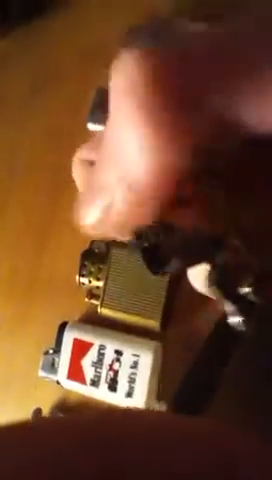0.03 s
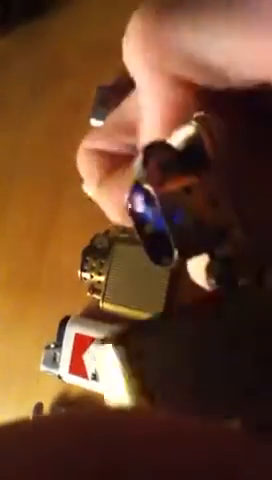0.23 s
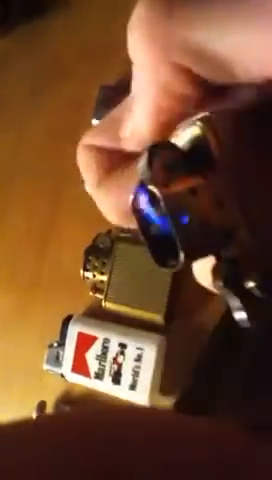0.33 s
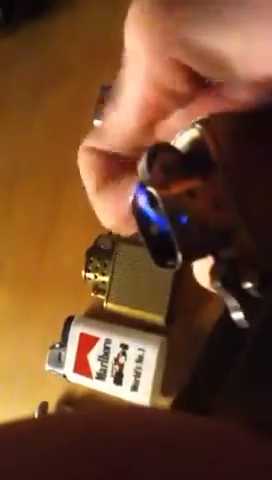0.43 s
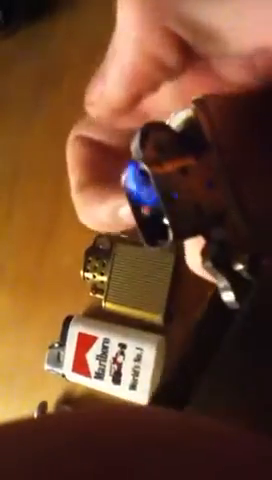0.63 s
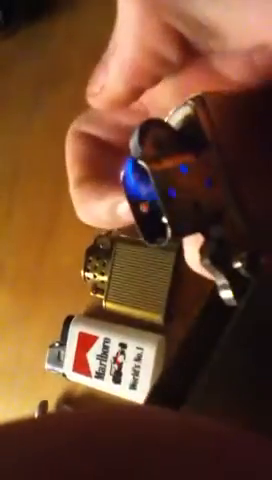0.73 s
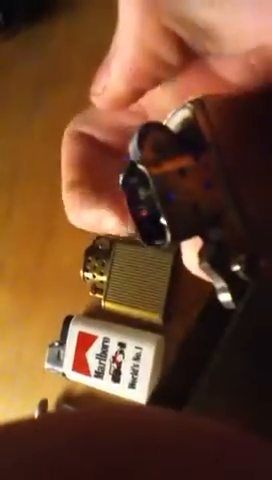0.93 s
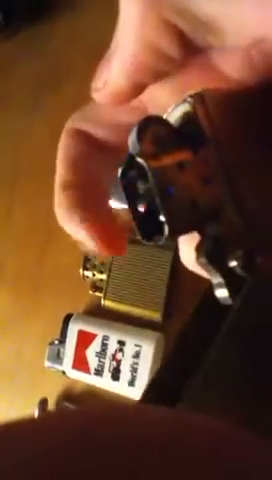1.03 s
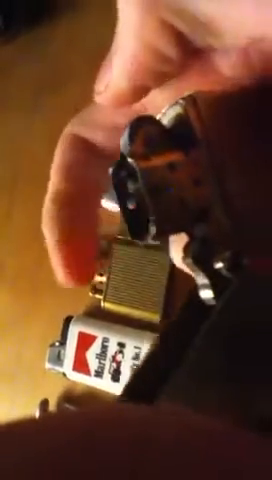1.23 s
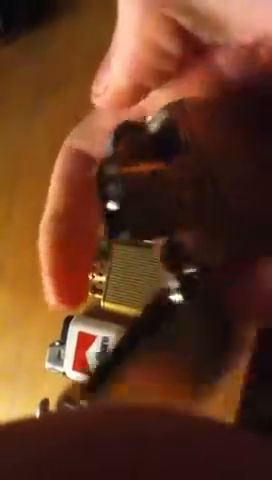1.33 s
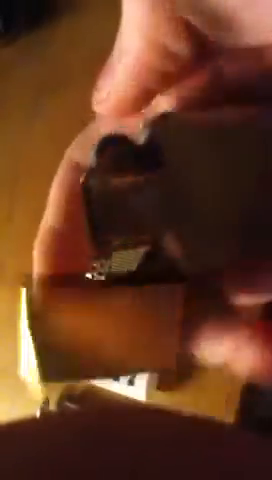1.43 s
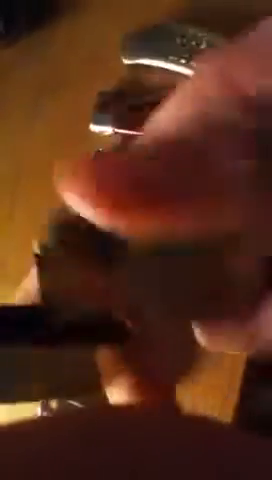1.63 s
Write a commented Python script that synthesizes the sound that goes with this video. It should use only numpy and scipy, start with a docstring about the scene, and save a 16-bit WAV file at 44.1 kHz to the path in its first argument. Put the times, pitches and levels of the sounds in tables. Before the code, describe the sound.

A metal flip lighter, very close in a small quiet room. After faint rumble and hiss, a tiny scrape leads to a sharp lid click at 0.23 s, then a louder, gritty flint-wheel snap at 0.26 s. The thin case rings bright and high, with small knocks and ticks until 0.47 s. A soft dull thump comes near 0.88 s, then quiet, and a lighter metallic tap at 1.55 s.

```python
"""In a quiet room, a thin metal pocket lighter is handled close to a phone: the lid clicks open, the flint wheel
rasps, loose parts knock the case so that its walls ring, and later it is tapped once more.
Case and lid are sums of decaying sines; clicks and rasp are impulses and dense grit exciting short body
resonances, with a noise tail for the room. Dull thumps are low damped modes.
Filtered noise makes the rumble and hiss beneath, and a faint sine the high whine."""
import sys
import numpy as np
from scipy import signal
from scipy.fft import rfft, irfft
from scipy.io import wavfile
from scipy.ndimage import uniform_filter1d

SR = 44100
rng = np.random.default_rng(int(sys.argv[2]) if len(sys.argv) > 2 else 0)


def ratio_of_db(decibels):
    """Turn decibels (scalar or array-like) into linear amplitude factors; 0 dB maps to 1."""
    return 10 ** (np.asarray(decibels, float) / 20)


def pcm_store(signal):
    """Save signal as 16-bit PCM."""
    levels = np.round(np.clip(np.atleast_2d(signal), -1, 1) * 32767)
    wavfile.write(sys.argv[1], SR, levels.astype(np.int16).T)


N = 74970  # samples

# knocks and touches that restart or damp the case's ring; click levels hold at 2 kHz, edge levels at the
# lowest edge mode:
# start_s, click_db, click_tilt_db_per_octave, wall_db, wall_t60_s (as gripped), edge_db, edge_tilt_db_per_octave
CONTACT_TABLE = [(.230, -9, -0.5, -45.5, 0.088, -48, -4), (.2648, -2, -5.5, -26, 0.12, -42, -11),
                 (.278, -24.5, 4, -23, 0.13, -33, -9), (.2955, -51, -11, -71, .1, -30.5, -13),
                 (.299, -47, 12, -24.5, 0.22, -35, -16), (.338, -41.5, 8, -37, 0.037, -44, -28),
                 (0.353, -55, -4, -49.5, 0.45, -46.5, -25), (.382, -80, 0, -64, 0.9, -54, -16),
                 (.442, -30.5, 0.5, -46.5, 0.38, -52.5, -8), (.462, -39, 2.5, -43.5, .2, -64, -5),
                 (0.468, -54, 6, -58.5, 0.28, -63.5, -3), (1.519, -70, -5, -55, 0.066, -80, 14),
                 (1.5535, -23.5, 5.5, -37.5, 0.057, -38.5, 2)]


def mode(x, hz, t60):
    """Damped resonator: a complex pole answers a unit impulse with a decaying sine of unit starting envelope."""
    pole = np.exp(2j * np.pi * hz / SR - np.log(1000) / (max(t60, 1e-3) * SR))
    return signal.lfilter([1], [1, -pole], x + 0j).imag


def struck_modes(strikes):
    """Superposition: each strike (start_s, level_db, pitch_hz, t60_s) rings freely over the earlier ones."""
    out = np.zeros(N)
    for start_s, level_db, hz, t60 in strikes:
        impulse = np.zeros(N)
        impulse[int(start_s * SR)] = ratio_of_db(level_db)
        out += mode(impulse, hz, t60)
    return out


def walk(rate):
    """Slow random drift: held random values smoothed twice, scaled to unit standard deviation."""
    hold = int(SR / rate)
    steps = np.repeat(rng.standard_normal(N // hold + 1), hold)
    drift = uniform_filter1d(uniform_filter1d(steps, hold), hold)[:N]
    return drift / drift.std()


def ring(hz, levels_db, t60s):
    """Exponential decay of one case mode: each knock or touch ends the old ring and sets a new level and decay."""
    t = np.arange(N) / SR
    starts = np.array([contact[0] for contact in CONTACT_TABLE])
    latest = np.searchsorted(starts, t, side="right") - 1
    age = np.abs(t - starts[latest])
    decay_db = 60 * age / np.maximum(np.asarray(t60s)[latest], 1e-3)
    envelope = np.where(latest < 0, 0, ratio_of_db(np.asarray(levels_db)[latest] - decay_db))
    envelope = uniform_filter1d(envelope, size=24)  # softens the jump at each contact
    return envelope * np.sin(2 * np.pi * hz * t + rng.uniform(0, 2 * np.pi))


def case():
    """Modal vibration: broad walls decay as the grip damps them, stiff edges at their own fixed rates."""
    # broad wall modes: pitch_hz, relative_level_db
    wall_modes = [(1455, 0), (1860, -11), (1545, -17)]
    # stiff edge and lid modes: pitch_hz, relative_level_db, t60_s
    edge_modes = [(4555, 0, .33), (7305, -3, .115), (7682, -23, .17), (9889, -3, .095), (11140, -22, .11),
                  (13330, -17, .046)]
    rows = np.array(CONTACT_TABLE)
    out = np.zeros(N)
    for hz, db in wall_modes:
        out += ring(hz, rows[:, 3] + db, rows[:, 4])
    for hz, db, t60 in edge_modes:
        octaves = np.log2(hz / edge_modes[0][0])
        out += ring(hz, rows[:, 5] + db + rows[:, 6] * octaves, np.full(len(rows), t60))
    return out


def lid():
    """Light damping: the free-hanging lid's long thin ring carries on through later knocks."""
    # strikes on the lid: start_s, level_db, t60_s
    lid_strikes = [(.278, -54, 0.74), (1.5535, -55.5, 0.35)]
    lid_hz = 5195
    return struck_modes([(start_s, db, lid_hz, t60) for start_s, db, t60 in lid_strikes])


def grit():
    """Friction grain noise: dense random impulses of scattered size, high-passed and set to a fixed rms."""
    grains_per_s, scatter_db, low_cut_hz = 15000, 3, 1300
    present = rng.random(N) < grains_per_s / SR
    grains = present * rng.standard_normal(N) * ratio_of_db(scatter_db * rng.standard_normal(N))
    grains = signal.sosfilt(signal.butter(2, low_cut_hz, "high", fs=SR, output="sos"), grains)
    return grains / grains.std() / np.sqrt(40)


def wheel_rasp():
    """Friction on the flint wheel as a moving excitation spectrum: level in dB at 2 kHz, and tilt per octave."""
    # moments of the rasp: start_s
    wheel_times = [.249, .253, .257, .260, .2632, .2655, .2675, .273, .29, .32, .342, .35]
    # rasp at those moments: level_db (at 2 kHz, before the rattle), treble_tilt_db_per_octave
    wheel_strength = [(-50, -5), (-30, -4), (-20, 7.5), (-25.5, 10), (-21, 8), (-12, -2.5), (-21.5, 12),
                      (-39.5, 7), (-35, -2), (-50.5, 3), (-65, 12), (-80, 0)]
    rattle_db, rattle_per_s = 3, 250
    t = np.arange(N) / SR
    strength = np.array(wheel_strength)
    level_db = np.interp(t, wheel_times, strength[:, 0], left=-120, right=-120)
    tilt = np.interp(t, wheel_times, strength[:, 1])
    level_db = level_db + rattle_db * walk(rattle_per_s) * (t > wheel_times[7])
    return level_db, tilt


def thumb_scrape():
    """Growing friction: the gain of the thumb's scrape rises just before the lid snaps."""
    # scrape: start_s, end_s, end_level_db, rise_db
    lead_in = (.221, .230, -29, 20)
    start_s, end_s, end_db, rise_db = lead_in
    t = np.arange(N) / SR
    remaining = np.clip((end_s - t) / (end_s - start_s), 0, 1)
    return ((t > start_s) & (t < end_s)) * ratio_of_db(end_db - rise_db * remaining)


def clicks():
    """Source and filter: contacts, ticks and grit excite the short body resonances that colour them."""
    # small ticks that leave the ring alone: start_s, level_db (at 2 kHz), tilt_db_per_octave
    small_ticks = [(0.2312, -23.5, -0.5), (.246, -61, -3), (0.282, -40, 6), (.289, -43, -6),
                   (.303, -47, -7), (.326, -48, 9), (.4435, -47, 2), (0.448, -39, -14), (.4505, -46, -11),
                   (.472, -49, 4), (.797, -51, 5), (1.5541, -33.5, 8), (.263, -12.5, -12), (.2585, -44, 22)]
    # short body resonances: pitch_hz, relative_level_db, t60_s
    body_modes = [(650, -17, 0.004), (1409, -12, 0.03), (1950, -2.5, 0.0093), (2132, -6, .03),
                  (2304, 2, 0.012), (2504, -1.5, 0.018), (2957, -0.5, 0.0093), (3670, -6, .01),
                  (4120, 1, 0.005), (4940, 1.5, 0.0048), (5650, -9, 0.0034), (6120, -7.5, 0.0053),
                  (7470, -4, 0.0036), (8680, -1.5, 0.0027), (10200, -5, 0.0027), (12700, -29, 0.01),
                  (15000, -38, 0.0065)]
    colour_scatter_db, low_cut_hz = 3.5, 470
    rows = np.array([contact[:3] for contact in CONTACT_TABLE] + small_ticks)
    at = (rows[:, 0] * SR).astype(int)
    colour = colour_scatter_db * rng.standard_normal((len(rows), len(body_modes)))
    grains = grit()
    wheel_db, wheel_tilt = wheel_rasp()
    scrape = thumb_scrape()
    out = np.zeros(N)
    for j, (hz, db, t60) in enumerate(body_modes):
        octaves = np.log2(hz / 2000)
        # the scrape reaches only the modes below 5 kHz
        excitation = grains * (ratio_of_db(wheel_db + wheel_tilt * octaves) + scrape * (hz < 5000))
        impulse_db = rows[:, 1] + rows[:, 2] * octaves + colour[:, j]
        excitation[at] += (-1) ** j * ratio_of_db(impulse_db)  # neighbouring modes start in opposite phase
        out += ratio_of_db(db - 11.5) * mode(excitation, hz, t60)
    return signal.sosfilt(signal.butter(2, low_cut_hz, "high", fs=SR, output="sos"), out)


def thumps():
    """Heavily damped low modes: dull pushes through the hand, high-passed at 45 Hz."""
    # thumps: start_s, level_db, pitch_hz, t60_s
    hand_thumps = [(.230, -32, 266, 0.014), (.230, -35, 1060, 0.021), (1.5519, -54, 900, 0.036),
                   (.264, -36, 537, 0.018), (.266, -34, 252, 0.046), (.266, -39.5, 149, 0.13),
                   (.268, -43, 58.6, 0.12), (.299, -47, 496, 0.02), (.336, -41.5, 786, 0.023),
                   (.425, -51, 237, 0.086), (.880, -45.5, 117, 0.063), (1.49, -58, 88, 0.2)]
    high_pass = signal.butter(2, 45, "high", fs=SR, output="sos")
    return signal.sosfilt(high_pass, struck_modes(hand_thumps))


def room_tail(sharp):
    """Diffuse reverberation: convolution with exponentially decaying noise of unit energy, dulled above 7 kHz."""
    level_db, t60_s, top_hz, delay_s = -20, .25, 7000, .003
    t = np.arange(SR // 2) / SR
    tail = rng.standard_normal(len(t)) * ratio_of_db(-60 * t / t60_s) * (t > delay_s)
    tail = signal.sosfilt(signal.butter(1, top_hz, fs=SR, output="sos"), tail)
    tail = tail / np.sqrt(np.sum(tail ** 2))
    return ratio_of_db(level_db) * signal.fftconvolve(sharp, tail)[:N]


def floor():
    """Spectrally shaped noise: room rumble that swells a little, even microphone hiss and a faint high whine."""
    # shape of the noise spectrum: pitch_hz, relative_level_db
    floor_shape = [(15, -44), (25, -15), (114, -4), (145, -4), (206, -2.5), (242, -4.5), (344, -8),
                   (591, -14), (641, -12), (818, -17), (1130, -18.5), (2690, -21), (14800, -25.5),
                   (16000, -30)]
    floor_db, swell_db, split_hz, hiss_top_hz = -58.5, 1.2, 600, 15750
    whine_hz, whine_db, whine_drift_db = 14990, -87, 3.0
    f = np.fft.rfftfreq(N, 1 / SR)
    points = np.array(floor_shape)
    shape_db = np.interp(np.log(f + 1), np.log(points[:, 0]), points[:, 1])
    spectrum = rfft(rng.standard_normal(N)) * ratio_of_db(shape_db)
    rumble = irfft(spectrum * (f < split_hz), N)
    hiss = irfft(spectrum * (f >= split_hz) * (f < hiss_top_hz), N)
    noise = rumble * ratio_of_db(swell_db * walk(3.62)) + hiss
    whine = np.sin(2 * np.pi * whine_hz * np.arange(N) / SR) * ratio_of_db(whine_db + whine_drift_db * walk(8))
    return noise / noise.std() * ratio_of_db(floor_db) + whine


def scene():
    """Linear superposition: the lighter's parts, a short room tail on its clicks, and the floor."""
    sharp = clicks()
    near = case() + lid() + sharp + thumps()
    return (near + room_tail(sharp) + floor())[None]


def top_cut(x):
    """Nothing passes above the cut-off."""
    return signal.sosfilt(signal.butter(12, 16640, fs=SR, output="sos"), x)


def record(dry):
    """Band limiting: the phone's steep elliptic low-pass removes the top above 16.6 kHz."""
    top_hz = 16600
    low_pass = signal.ellip(8, .2, 70, top_hz, fs=SR, output="sos")
    mix = signal.sosfilt(low_pass, dry)
    return top_cut(mix)


dry = scene()
out = record(dry)
pcm_store(out)
```